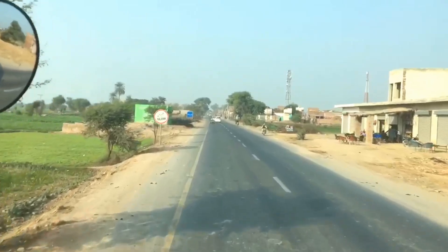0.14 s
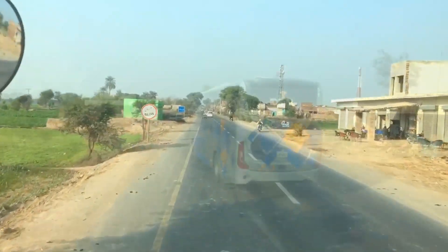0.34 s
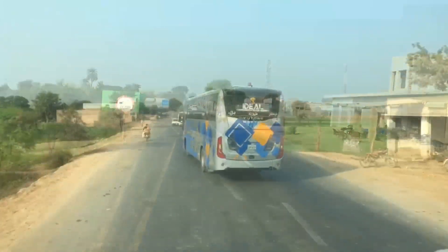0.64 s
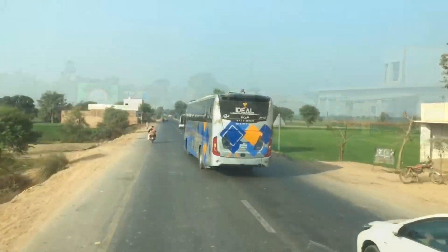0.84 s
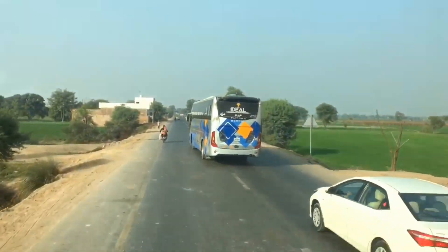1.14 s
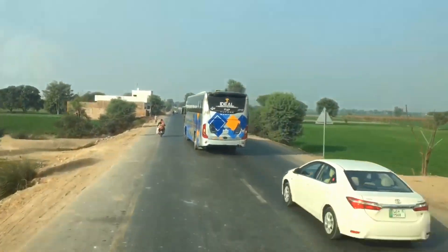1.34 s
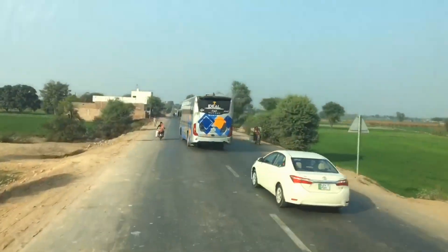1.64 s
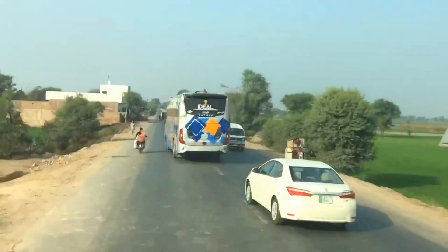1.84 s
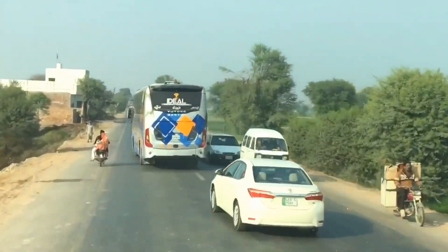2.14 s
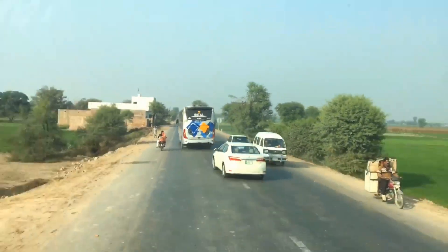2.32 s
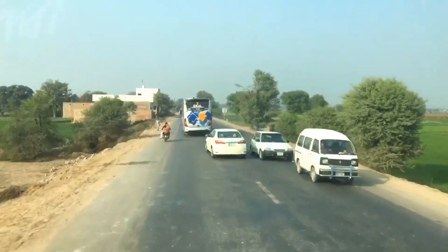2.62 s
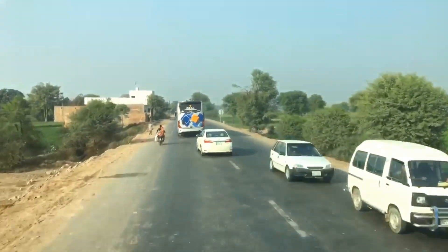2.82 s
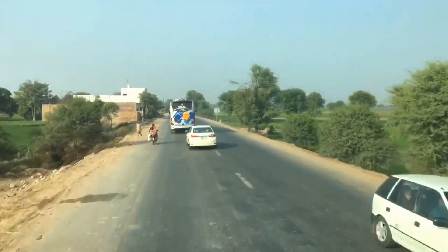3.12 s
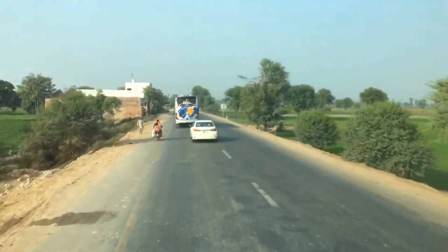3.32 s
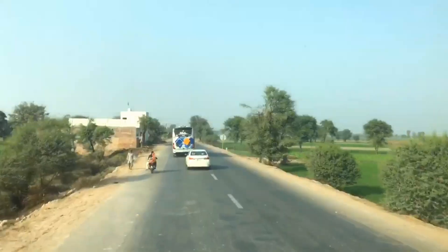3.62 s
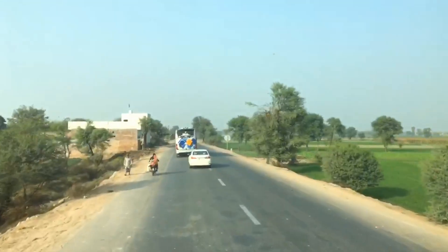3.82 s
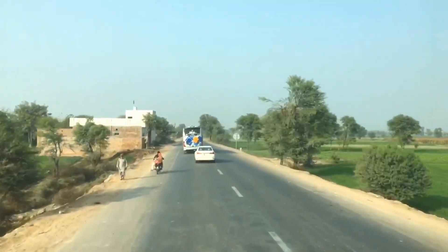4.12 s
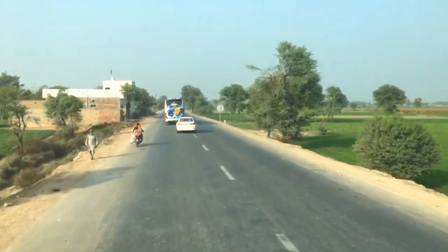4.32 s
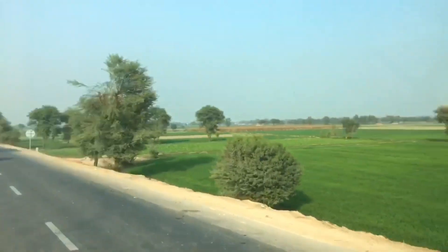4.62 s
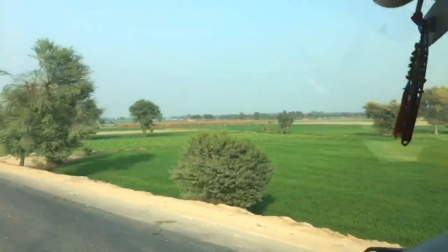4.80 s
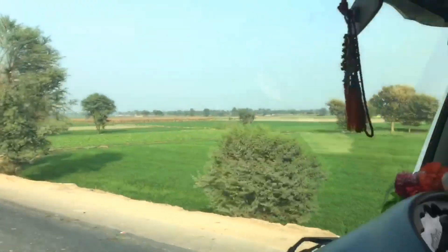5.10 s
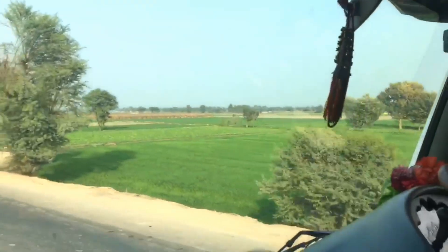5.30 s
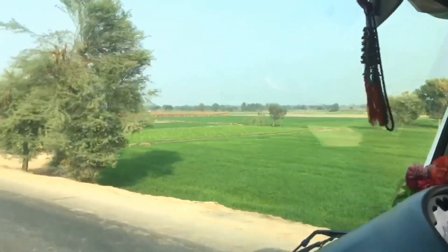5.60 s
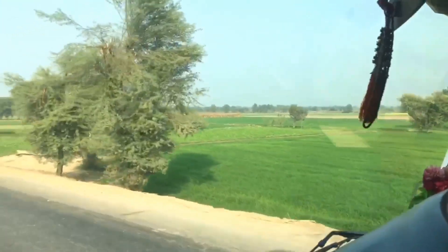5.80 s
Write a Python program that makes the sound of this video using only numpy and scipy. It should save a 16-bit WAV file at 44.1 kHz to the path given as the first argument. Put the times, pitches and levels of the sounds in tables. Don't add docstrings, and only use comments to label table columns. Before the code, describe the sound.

Inside a truck cab on an open road: booming low engine and road rumble, a brief distant horn, passing cars, ticking trim, slowly rising revs.

```python
import sys
import numpy as np
from scipy import signal
from scipy.fft import rfft, irfft, next_fast_len
from scipy.io import wavfile
from scipy.ndimage import uniform_filter1d, minimum_filter1d

SR = 44100
rng = np.random.default_rng(int(sys.argv[2]) if len(sys.argv) > 2 else 0)


def rack_gain(trim_db):
    fader = np.asarray(trim_db, float)
    return 10 ** (fader / 20)


def wav_out(sig):
    wavfile.write(sys.argv[1], SR, np.round(np.clip(np.atleast_2d(sig).T, -1, 1) * 32767).astype(np.int16))


N = 262395
T = np.arange(N) / SR
CUT_S = .97966
# middle in seconds, rise of the spray in dB, half length in seconds.
PASSES = [(2.95, 5, 0.11), (3.1, 3, 0.14), (3.225, 5, 0.064), (3.26, 5.5, 0.1), (3.43, 9, 0.22),
          (4.34, 3.5, .03), (4.66, 4, 0.025), (4.92, 3, 0.035), (5.01, 2.5, 0.051), (5.16, 0, .04),
          (5.6, 0.5, .08), (5.71, 7, 0.022)]


def curve(table):
    return np.interp(T, *np.transpose(table))


def humps(rows):
    return sum(db * np.clip(1 - np.abs(T - s) / half, 0, 1) for s, db, half in rows)


def unit(x):
    return x / np.sqrt(np.mean(x ** 2))


def walk(rate):
    hold = int(SR / rate)
    levels = np.repeat(rng.standard_normal(N // hold + 1), hold)
    return 1.15 * uniform_filter1d(uniform_filter1d(levels, hold), hold)[:N]


def ring(x, hz, width_hz):
    return signal.lfilter(*signal.iirpeak(hz, hz / width_hz, fs=SR), x)


def steep(x, hz, width_hz):
    return ring(ring(x, hz, 1.5 * width_hz), hz, 1.5 * width_hz)


def rush(spectrum, swell_db, flicker_db):
    size = next_fast_len(N)
    octave = np.log2(np.maximum(np.arange(size // 2 + 1) * SR / size, 1))
    hz, db = np.transpose(spectrum)
    noise = rfft(rng.standard_normal(size)) * rack_gain(np.interp(octave, np.log2(hz), db, -90, -90))
    out, swell = 0, walk(1.1)
    for centre in np.arange(np.floor(np.log2(hz[0])), np.log2(hz[-1]) + .5, .5):
        band = np.cos(np.pi * np.clip(octave - centre, -.5, .5)) ** 2
        level = rack_gain(swell_db * swell + flicker_db * walk(9))
        out = out + level * irfft(noise * band, size)[:N]
    return unit(out)


def add(out, s, sound):
    i = int(s * SR)
    out[i:i + len(sound)] += sound[:N - i]


def air():
    # pitch in Hz, level in dB per Hz.
    wind = [(1500, -15), (2000, 8.5), (2600, 5), (3100, 3.5), (4000, -2.5), (4500, -5), (5500, -10),
            (7000, -18.5), (10000, -29.5)]
    spray = [(3500, -7.5), (5000, -4), (6200, 0.5), (6900, -3), (7600, -0.5), (8500, -2.5), (9500, -5.5),
             (11000, -9), (12500, -9)]
    # pitch in Hz, width in Hz, level in dB.
    seal = [(2540, 160, 1), (4060, 180, -11), (5830, 200, -16), (7500, 150, -14.5), (7800, 300, -19),
            (8330, 60, -15.5)]
    wind_db, spray_db, seal_db, sag_db_s = -45, -58, -66, -0.97
    since_s = T - 3.58
    rise_db = humps(PASSES) + sag_db_s * (T - 1)
    lull_db = -np.clip(since_s / .05, 0, 1) * np.exp(-np.maximum(since_s, 0) / 1.5)
    hiss = rack_gain(wind_db + 0.53 * rise_db + lull_db) * rush(wind, 0.3, 1.14)
    hiss = hiss + rack_gain(spray_db + rise_db) * rush(spray, .2, 1.2)
    whistle = 0
    for hz, width_hz, db in seal:
        whistle = whistle + rack_gain(db + 2.8 * walk(3)) * steep(rng.standard_normal(N), hz, 0.55 * width_hz)
    return hiss + rack_gain(seal_db + rise_db) * unit(whistle)


def songs():
    # pitch in Hz, level in dB, middle in seconds, half length in seconds.
    singing_gaps = [(1143, -44, 0.5, 0.78), (2550, -52, .85, 0.33), (853, -46.5, 1.16, 0.62),
                    (1238, -46, 1.08, 0.34), (1264, -49, 1.7, 0.37), (1674, -44, 1.75, 0.26),
                    (1975, -51, 1.24, 0.81), (2486, -57, 1.3, 0.7), (4070, -60, 1.1, 0.74),
                    (6000, -66, 1.3, 0.65), (6500, -72, .8, .5), (7280, -66, 1, 0.65), (8320, -78, 1.2, .8),
                    (2186, -52, 2.35, 0.55), (8030, -75, 2.1, 0.97), (3046, -60.5, 6.6, 1.3),
                    (7300, -74, 4.3, .7), (7150, -78, 5.3, .7), (7550, -75, 6.3, .7), (5250, -72, 5.3, .7),
                    (9700, -83, 5.2, .8), (1200, -49.5, 4.8, 1.5), (1546, -48.5, 5.2, 0.54),
                    (1590, -51, 2, 0.55)]
    draught = rng.standard_normal(N)
    out = 0
    for hz, db, s, half in singing_gaps:
        swell = np.sqrt(np.clip(1 - np.abs(T - s) / half, 0, 1))
        tone = unit(steep(draught, hz, 27 + 0.0094 * hz))
        out = out + rack_gain(db + 2.5 * walk(6)) * swell * tone
    return out


def horn():
    reeds_hz = [356, 392, 432]
    peak_db, echo_db, swell_db_s, fall_db_s, release_db_s = -28.5, -40, 102, 120, 185
    late_s = T - 0.943
    fall_db = np.maximum(peak_db - fall_db_s * late_s, echo_db)
    db = np.where(late_s < 0, peak_db + swell_db_s * late_s, fall_db)
    db = db - release_db_s * np.maximum(T - 1.28, 0)
    reeds = 0
    for hz, share in zip(reeds_hz, [1.2, .6, .55]):
        reeds = reeds + share * np.sin(2 * np.pi * (hz * T + 0.046 * walk(5.5)))
    return rack_gain(db) * reeds


def rattles():
    # start in seconds, peak in dB, pitch in Hz, length in milliseconds. Hits near 2.04, 2.14, 2.24,
    # 2.53, 3.02, 3.22, 3.52 and 3.72 s come with the loudest cylinder, once per engine cycle
    hits = [(1.877, -28, 1400, 4), (1.892, -23, 1000, 9), (1.987, -28, 1630, 4),
            (2.2684, -27, 1560, 4), (2.6954, -27, 1570, 4), (2.813, -28, 1650, 4),
            (2.9234, -26, 1700, 7), (3.085, -28, 1600, 5), (3.134, -27, 1700, 4),
            (3.153, -27, 1650, 4), (3.186, -28, 1550, 4), (3.229, -26, 1700, 5), (3.733, -28, 1900, 4),
            (1.9465, -27, 1690, 5), (2.041, -23, 1680, 5), (2.1066, -26, 1650, 5),
            (2.140, -23, 1650, 4), (2.238, -24, 1680, 5), (2.310, -28, 1450, 4), (2.323, -26, 1500, 4),
            (2.337, -26, 1680, 5), (2.376, -27, 1600, 6), (2.472, -27, 1600, 6),
            (2.533, -23.5, 1650, 4), (2.729, -27, 1580, 5), (2.882, -27, 1550, 5),
            (3.021, -18.5, 1750, 11), (3.053, -28, 1600, 6), (3.119, -25, 1590, 5),
            (3.216, -22, 1600, 9), (3.379, -26, 1500, 6), (3.402, -27, 1530, 6), (3.435, -27, 1600, 5),
            (3.505, -29, 1550, 6), (3.524, -20, 1650, 7), (3.541, -23.5, 1620, 7),
            (3.543, -31, 2500, 9), (3.579, -27, 2100, 6), (3.590, -25.5, 2050, 5),
            (3.594, -27, 1500, 6), (3.603, -26, 1650, 4), (3.698, -24.5, 1650, 6),
            (3.721, -17.5, 1650, 6), (3.727, -20.5, 1750, 6), (4.426, -29, 1450, 4),
            (4.455, -28, 1420, 4), (4.681, -31, 1500, 4), (5.011, -27, 1550, 4), (5.514, -28, 1500, 4),
            (5.9175, -28, 1600, 4)]
    out, t = np.zeros(N), T[:2500]
    for s, db, hz, ms in hits:
        blow = .11 * rng.standard_normal(len(t)) * np.exp(-t * 1000 / ms)
        blow[0] += 1.5
        blow[int(.0025 * SR)] += 1.2 * (ms > 6)
        buzz = steep(blow, hz, 240) + .75 * steep(blow, .88 * hz, 240)
        buzz = buzz + .85 * (hz < 2000) * steep(blow, .74 * hz, 200)
        buzz = signal.sosfilt(signal.butter(4, 1.35 * hz, fs=SR, output="sos"), buzz)
        add(out, s, rack_gain(db) * buzz / np.abs(buzz).max())
    return out


def ticks():
    # start in seconds, peak in dB, pitch in Hz.
    trim_ticks = [(1.773, -36, 2200), (1.773, -35, 3800), (1.773, -48, 5800), (1.773, -47, 9000),
                  (3.195, -42, 4500), (3.231, -38, 4500), (4.654, -40, 4300), (4.989, -49, 6000),
                  (5.027, -52, 8970), (5.119, -46, 6500), (5.119, -54, 9500), (5.158, -49, 10470),
                  (5.163, -50, 10470), (5.364, -45, 5000), (5.544, -42, 4500), (5.605, -45, 4500),
                  (5.634, -44, 5500), (5.695, -43, 5500), (5.712, -44, 5500), (5.785, -46, 4500),
                  (5.846, -46, 4500), (5.906, -45, 4500), (5.935, -45, 5000)]
    out, t = np.zeros(N), T[:2500]
    for s, db, hz in trim_ticks:
        crack = steep(rng.standard_normal(len(t)) * np.exp(-t / .0034), hz, 1900)
        add(out, s, rack_gain(db) * crack / np.abs(crack).max())
    return out


def dash_bump():
    out, t = np.zeros(N), T[:900]
    tone = np.sin(2 * np.pi * 640 * t + .5) * np.minimum(t / .0002, 1) * np.exp(-t / .0021)
    add(out, 1.7732, -rack_gain(-14.5) * tone)
    return out


def patchy(road):
    # middle in seconds, pitch in Hz, change in dB, half length in seconds.
    tarmac = [(.3, 99, -2, .3), (.7, 115, 4, 0.22), (.1, 280, 3, 0.27), (0.017, 85, 3, .08),
              (1.097, 100, 4.5, 0.3), (1.1, 260, -3, 0.15), (1.452, 260, -8.5, 0.14),
              (1.893, 160, 7, 0.092), (1.9, 400, 3.5, 0.07), (2.34, 165, 4.5, 0.068), (2.5, 105, -3.5, .15),
              (2.92, 220, 3.5, 0.091), (3.11, 161, 5.5, 0.13), (3.3, 400, -1.5, 0.38), (3.5, 140, -4, 0.14),
              (3.68, 175, 7, 0.11), (3.5, 780, 3.5, 0.19), (5.723, 150, 2.5, 0.093), (3.9, 106, 3.5, 0.21),
              (4.15, 100, -6, .12), (4.356, 407, -5.5, .25), (4.35, 110, 2, 0.11), (4.6, 236, 3, 0.1),
              (5.197, 100, -3.5, .15), (5.4, 400, 1.5, .3), (5.5, 210, 2, 0.074), (4.5, 150, 3, .15)]
    change = 0
    for s, hz, db, half in tarmac:
        change = change + (rack_gain(humps([(s, db, half)])) - 1) * ring(road, hz, 0.4 * hz)
    return road + change


def throb(turns):
    return rack_gain(-1.6 * np.cos(2 * np.pi * turns))


def crank(rate):
    turns = np.cumsum(curve(rate)) / SR
    return turns - turns[int(CUT_S * SR)]


def drone(turns, orders_db, waver_db):
    sixths = np.array(np.array([6, 7, 8, 9, 10, 12, 14, 15, 16, 17, 18, 19, 20, 21, 22, 24, 32, 42, 84]))
    out = 0
    for sixth, db in zip(sixths, orders_db):
        free = sixth != 6
        phase = sixth / 6 * turns + rng.random() * free + 0.048 * walk(1.9)
        out = out + rack_gain(db + waver_db * free * walk(5)) * np.cos(2 * np.pi * phase)
    return np.sqrt(2) * out


def knock(turns):
    cylinder_db = np.array([1.5, -6, -4, -3, -2.5, -5])
    # pitch in Hz, width in Hz, level in dB.
    block = [(877, 135, 1), (1231, 143, 3.5), (1373, 110, 2.5), (1500, 147, 1.5), (1657, 42, -3)]
    turns = turns - turns[int(2.0395 * SR)]
    firing = np.floor(turns).astype(int)
    scatter_db = rng.standard_normal(firing[-1] - firing[0] + 1)[firing - firing[0]]
    strength = rack_gain(cylinder_db[firing % 6] + scatter_db)
    burst = (0.5 + strength * np.exp(-(turns % 1) / 0.38)) * rng.standard_normal(N)
    rung = sum(rack_gain(db) * steep(burst, hz, width_hz) for hz, width_hz, db in block)
    return unit(signal.sosfilt(signal.cheby1(6, .5, 1800, fs=SR, output="sos"), rung))


def first_stretch():
    rate = [(0, 52.4), (.3, 52.75), (1, 52.9)]
    orders_db = [1.5, -24, -36, -22, -22, -18, -19, -19, -14.5, -24, -12.5, -36, -27, -33, -27, -40, -22.5,
                 -40, -28.5]
    # pitch in Hz, level in dB per Hz.
    road_colour = [(25, -22.5), (40, -5), (70, -0.5), (150, -5.5), (190, -15.5), (300, -22.5), (500, -21.5),
                   (750, -23.5), (1200, -29.5), (2000, -35), (4000, -54.5), (7000, -63.5), (11000, -78),
                   (12500, -80)]
    hiss_colour = [(2500, -6), (4000, -7), (7000, -18), (9000, -20), (12300, -24)]
    turns = crank(rate)
    engine = rack_gain(-14 + walk(19.4)) * drone(turns + .09, orders_db, waver_db=1.1)
    road = rack_gain(-21) * throb(turns + 0.082) * patchy(rush(road_colour, .5, 0.98))
    return engine + road + rack_gain(-62) * rush(hiss_colour, .3, 1.1)


def second_stretch():
    rate = [(0, 61.4), (2.1, 60.95), (2.6, 61.06), (3.1, 61.63), (4, 63.21), (4.5, 64.0), (5.25, 65.7),
            (5.95, 67.15)]
    orders_db = [-38, -43, -45, -38, -43, -41, -46, -44, -39, -46, -42.5, -46, -44, -44, -44, -39.5, -41.5,
                 -49, -59.5]
    road_colour = [(25, -25), (40, -11), (55, -3), (72, 1), (90, 4), (130, 0), (200, -4.5), (290, -9.5),
                   (380, -8), (520, -18), (700, -21.5), (1000, -23.5), (1500, -24), (2100, -33.5),
                   (3200, -46)]
    load = [(1, 0.23), (1.3, 0.02), (1.6, 0.3), (1.86, 0.25), (2.05, 0.69), (2.5, 0.77), (2.85, 0.88),
            (3.15, 0.83), (3.3, 0.82), (3.5, 0.93), (4.2, 0.97), (4.7, 0.98), (5.3, 1.02), (5.95, 1)]
    # middle in seconds, knock change in dB, half length in seconds.
    lifts = [
        (3.8, -1.5, 0.34),
        (5.5, -0.5, 0.29),
    ]
    turns = crank(rate)

    boom_db = -28.3 + 15 * curve(load)
    boom = np.sqrt(2) * rack_gain(boom_db + 0.2 * walk(5.7)) * np.cos(2 * np.pi * (turns + 0.38))
    hum = rack_gain(0.15 * (boom_db + 10.5)) * drone(turns, orders_db, waver_db=3.0)

    pedal_s, coast_knock_db, pull_knock_db = 1.826, -51.56, -38.56
    pedal = np.clip((T - pedal_s) / 0.074, 0, 1)
    bark_db = 2.5 * np.exp(-np.maximum(T - pedal_s, 0) / 0.45)
    pull_db = pull_knock_db + bark_db + humps(lifts)
    knocking = rack_gain(coast_knock_db + pedal * (pull_db - coast_knock_db)) * knock(turns)

    double = np.sqrt(2) * rack_gain(-35 + walk(4)) * np.cos(4 * np.pi * (turns + .3))
    double = double * np.clip((T - 3.9) / .4, 0, 1)

    road = throb(turns + 0.36) * patchy(rush(road_colour, 0.4, 0.92))
    road = road - 0.37 * (1 - pedal) * ring(road, 190, 82)
    road_db = -23.06 - 0.26 * (T - 0.5) + 0.22 * humps(PASSES)
    return boom + hum + knocking + double + rack_gain(road_db) * road


def thin_treble(x):
    starved = [(2500, 0), (4000, .01), (6000, .03), (8500, .065), (10000, .1), (11300, .13), (11650, .5),
               (12000, .9)]
    x = signal.sosfiltfilt(signal.ellip(8, .1, 45, 11950, fs=SR, output="sos"), x)
    hz, _, z = signal.stft(x, SR, nperseg=1024, noverlap=768)
    luck = rng.random((len(hz) // 3 + 1, z.shape[1]))
    luck = np.repeat(luck, 3, axis=0)[:len(hz)]
    lost = luck < np.interp(hz, *np.transpose(starved))[:, None] / 8
    kept = minimum_filter1d(1. - lost, 9, axis=1)
    return signal.istft(z * kept, SR, nperseg=1024, noverlap=768)[1][:N]


def scene():
    fade = np.clip(0.022 + T / 0.93, 0, 1)
    first = first_stretch()
    second = fade * (air() + second_stretch())
    second = second + songs() + horn() + rattles() + ticks() + dash_bump()
    return (thin_treble(first) * (T < CUT_S) + thin_treble(second))[None]


def roll_off(x):
    return signal.sosfilt(signal.butter(12, 15700, fs=SR, output="sos"), x)


def record(dry):
    return roll_off(np.tanh(dry))


dry = scene()
out = record(dry)
wav_out(out)
```